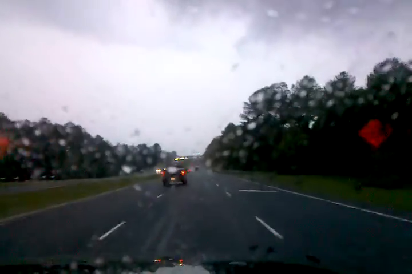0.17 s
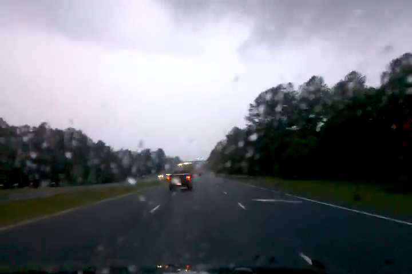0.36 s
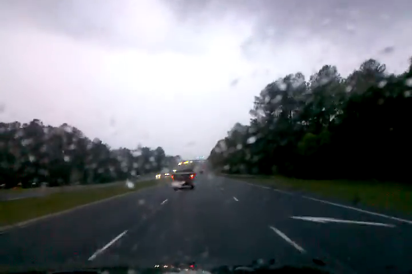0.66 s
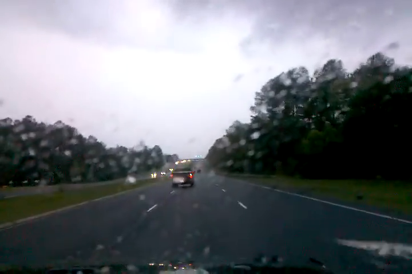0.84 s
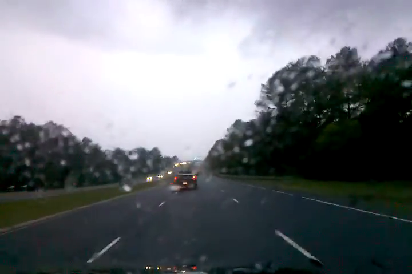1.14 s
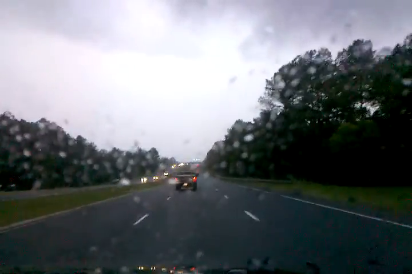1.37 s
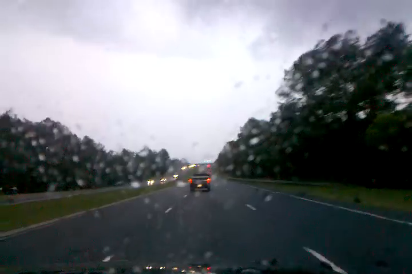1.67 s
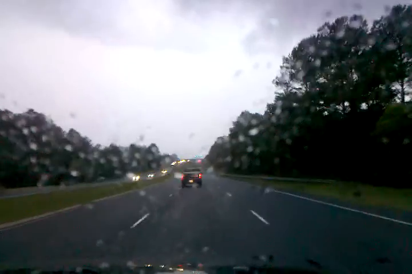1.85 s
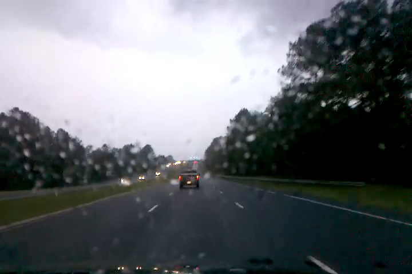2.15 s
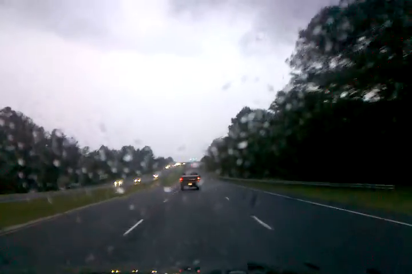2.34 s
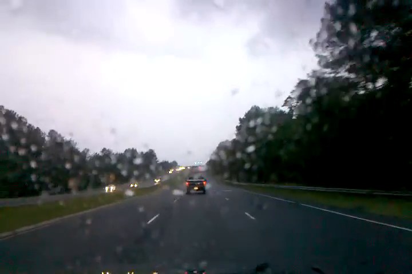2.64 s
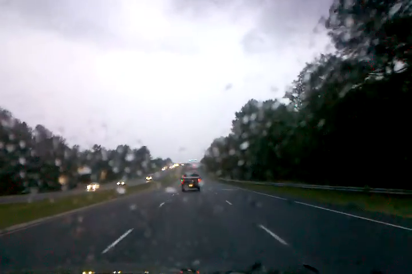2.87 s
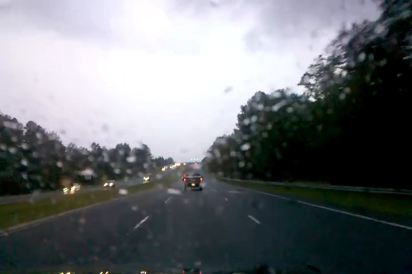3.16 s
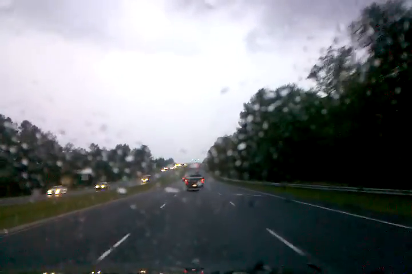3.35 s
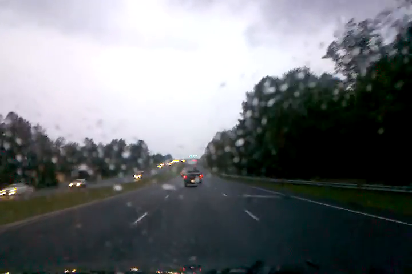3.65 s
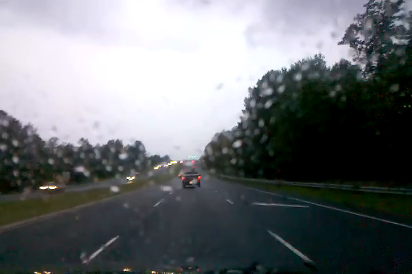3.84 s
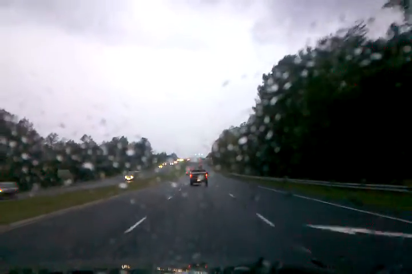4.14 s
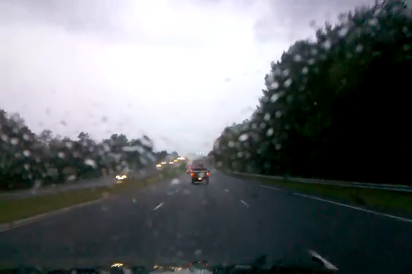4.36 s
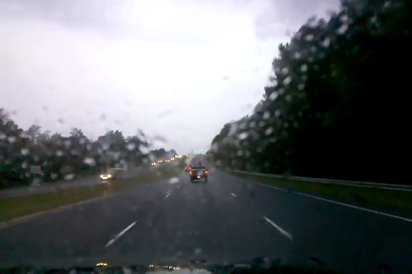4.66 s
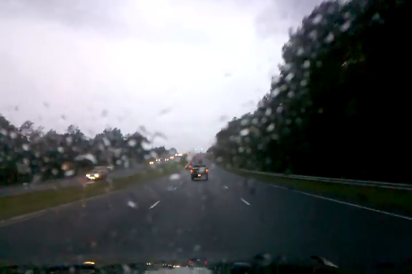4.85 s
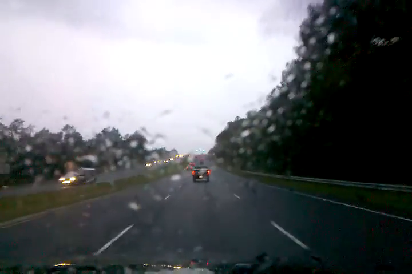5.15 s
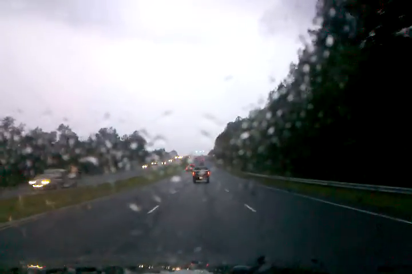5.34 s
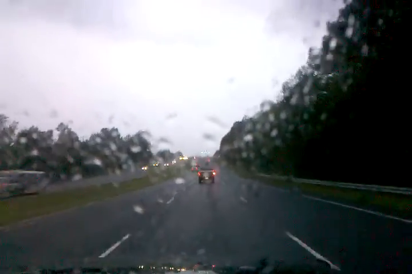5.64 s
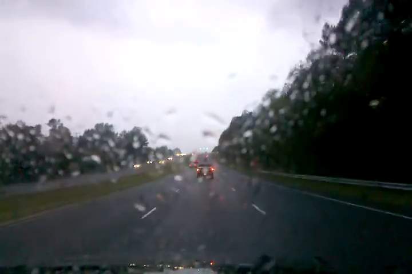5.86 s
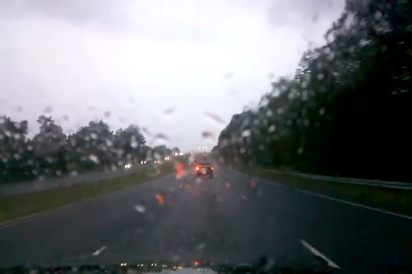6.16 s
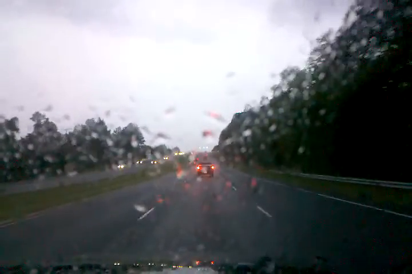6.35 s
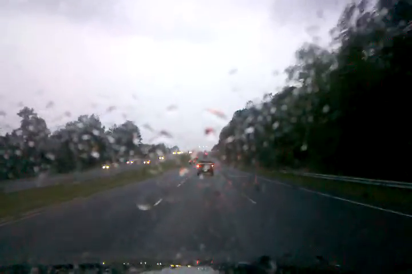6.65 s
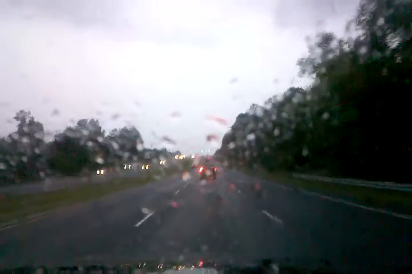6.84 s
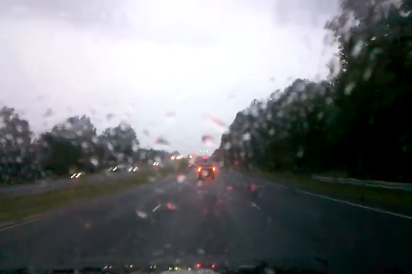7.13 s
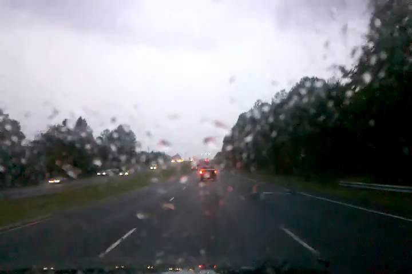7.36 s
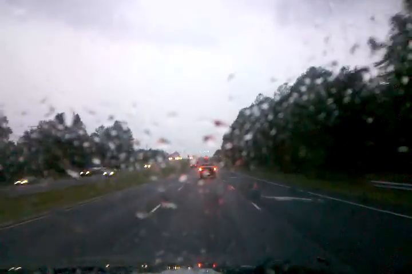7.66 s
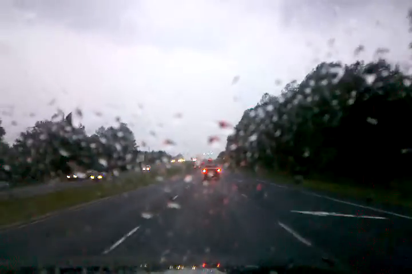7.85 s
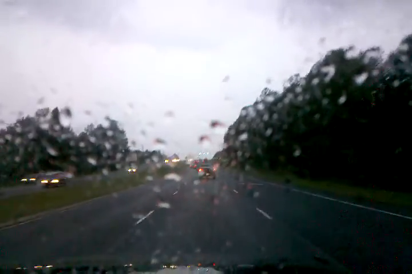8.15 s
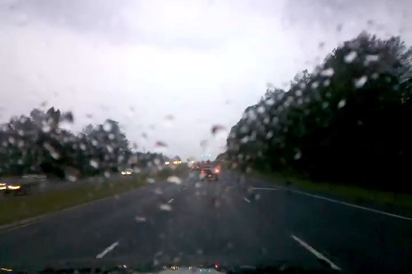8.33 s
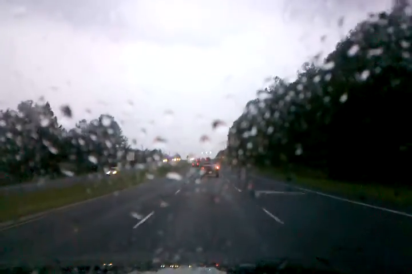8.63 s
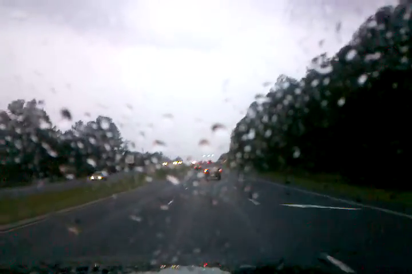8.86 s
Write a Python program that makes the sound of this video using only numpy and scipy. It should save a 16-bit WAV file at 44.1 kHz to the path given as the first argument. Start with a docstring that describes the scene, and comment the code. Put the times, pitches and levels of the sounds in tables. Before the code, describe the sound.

Steady tyre rumble and rushing wind fill a moving car, with the microphone inside. The start is loudest, with short buffets of air and a sharp knock from the trim, and two more knocks follow in the first third. Wet road spray hisses against the body while light, grainy rain patters on the windshield, with larger drops ticking out irregularly. The rumble eases a little as the rain carries on, sounding enclosed and somewhat muffled.

```python
"""Inside a car on a wet highway in the rain.
Tyres rumble through the cabin, gusts rush and buffet over the body, and the trim knocks now and then.
Road spray hisses on the body; rain sizzles on the windshield, with single fat drops ticking out.
Rumble and rush are fluttering noise, spray and rain are swarms of tiny impacts, all coloured by the
cabin's resonances. The sound is dull above 7 kHz, and its loudest peaks clip with a faint crackle."""
import sys
import numpy as np
from scipy import signal
from scipy.fft import rfft, irfft
from scipy.io import wavfile

SR = 44100
rng = np.random.default_rng(int(sys.argv[2]) if len(sys.argv) > 2 else 0)


def pcm_store(signal):
    """Save signal as 16-bit PCM."""
    levels = np.round(np.clip(np.atleast_2d(signal), -1, 1) * 32767)
    wavfile.write(sys.argv[1], SR, levels.astype(np.int16).T)


N = 396459

# Tone curve of each source: frequency_hz, gain_db
TYRE_EQ = [(20, -61), (32, -43.5), (50, -20), (70, -13), (110, -1.5), (150, 0.5), (220, -0.5), (290, -9.5),
           (360, -10), (600, -23.5), (1500, -39), (4000, -74.5)]
AIR_EQ = [(30, -50), (80, -19), (200, -1), (350, 1.5), (500, -2), (720, -6), (850, -9.5), (1000, -12),
          (1450, -20), (2200, -27), (3000, -34), (7000, -44)]
SPRAY_EQ = [(200, -31), (700, -3.5), (1200, 1), (1500, -2), (1900, -1), (2500, -2.5), (3000, -11.5),
            (3600, -16.5), (5000, -24), (8000, -29)]
SIZZLE_EQ = [(300, -34.5), (1200, -2), (2300, -1), (3000, -4.5), (3500, -5.5), (4500, -4), (5800, -2),
             (6900, 0.5), (8000, -6.5)]
BUFFET_EQ = [(40, -34), (130, 0), (420, 4.5), (650, -5.5), (1000, -5.5), (1400, -9.5), (2000, -12),
             (3500, -9.5), (7000, -30)]
DROP_EQ = [(300, -11), (1200, -5.5), (2400, 3.5), (3300, -2.5), (4200, -4.5), (4900, -4), (5700, -3.5),
           (6900, -1), (9000, -25.5)]
# Resonances of cabin air, panels and glass: centre_hz, width_hz, lift_db
CABIN_MODES = [(138, 7.8, 0.5), (215, 39, 1), (325.4, 30, -2), (350, 52, 2), (528, 20, 1), (642, 28, 4),
               (809, 106, 4), (896, 16, 3.5), (1138, 74, 1.5), (1230, 30, 5), (1265, 71, 3.5),
               (1380, 27, 4.5), (1360, 50, 0), (1579, 108, 6.5), (1708, 130, 4), (2120, 54, 4.5),
               (2240, 140, 1.5), (2512, 85, 3), (3934, 190, 4.5), (5240, 340, 6), (6540, 300, 1)]
# Fader rides for road roughness, gust strength and how hard it rains: time_s, relative_db
ROAD_RIDE = [(0.0, -13.5), (0.25, -13.5), (0.48, -17.5), (0.78, -11), (1.4, -15), (1.85, -16.5),
             (2.35, -17), (2.52, -15.5), (2.8, -17.5), (3.1, -15.4), (4.1, -15.0), (4.48, -18),
             (4.92, -13.5), (5.2, -18.9), (5.45, -16.5), (6.6, -19.0), (7.3, -18), (8.98, -18.5)]
GUST_RIDE = [(0.0, -11.5), (0.42, -20.0), (0.9, -15.5), (1.3, -16.0), (1.62, -20.5), (1.85, -21.0),
             (2.05, -17.5), (2.35, -21.5), (2.55, -17), (2.8, -21.0), (3.1, -13.5), (3.28, -22),
             (3.85, -16.5), (4.22, -19.5), (4.85, -17.5), (5.25, -20.9), (7.45, -20.5), (8.98, -22)]
RAIN_RIDE = [(0.0, -34), (0.3, -37), (0.8, -34), (1.3, -34.5), (1.62, -37.5), (2.1, -36.5), (2.38, -37),
             (2.65, -39.5), (3.15, -39), (3.75, -35), (4.35, -34.5), (4.92, -35), (5.08, -38.5),
             (5.75, -36), (6.45, -34.5), (7.15, -35.5), (7.7, -37.5), (8.98, -37.5)]
# Buffets of air on the body: peak_s, level_db, length_s, cutoff_hz
BUFFET_CUES = [(.03, -15.5, 0.034, 1600), (0.167, -12, .017, 328), (.28, -14, .022, 1300),
               (1.018, -17, .015, 300), (1.083, -12, 0.031, 298), (1.316, -17, .012, 2200),
               (1.504, -14.5, .02, 1400), (2.11, -19, .025, 400), (2.91, -19, .025, 300),
               (3.104, -18.5, 0.022, 1000), (3.813, -17.5, 0.027, 230), (4.306, -16, .025, 232),
               (7.275, -20, .03, 230), (7.97, -19, .04, 200)]
# Knocks of the cabin trim: start_s, peak_db
KNOCK_CUES = [(.2037, -4), (1.3155, -6), (3.1678, -6.5)]
# Ringing modes of the trim: pitch_hz, relative_db, t60_s
TRIM_MODES = [(554, 0.5, 0.019), (900, -0.5, .022), (1290, -4.5, 0.017)]
# Fat drops on the windshield: start_s, strength_db, ring_hz
DROP_CUES = [(0.5252, -5.5, 5200), (0.6109, -2.5, 5050), (0.7367, -7.5, 3890), (0.786, -4, 4770),
             (0.853, 1.5, 5300), (1.1474, -8, 5260), (1.491, 3, 5200), (1.784, -5, 3920),
             (1.8435, -6, 5170), (1.867, -1.5, 4900), (2.0022, -3.5, 5020), (2.535, -5, 5500),
             (2.771, -5, 5000), (3.8708, -6, 6760), (4.0644, -8, 5130), (4.6852, -4, 5050),
             (4.849, -2, 6100), (4.9002, -10, 5030), (5.4855, -8, 5250), (5.6533, -5.5, 5170),
             (6.0208, 1, 4930), (6.1433, -4, 5340), (6.2286, -8, 5000), (6.406, -4, 6860),
             (6.4684, -5.5, 5300), (6.9111, -11, 5360), (7.0767, -7.5, 6780), (7.237, -12, 6690),
             (7.3202, -8, 3840), (7.7931, -10, 5140), (8.423, -1.5, 5400)]
# Treble roll-off of the whole mix: frequency_hz, gain_db
MASTER_EQ = [(6800, 0), (7100, -5), (7400, -14), (7700, -23.5), (8100, -32.5), (8700, -27), (9300, -49.5),
             (11000, -63)]


def gain_of(db):
    """Decibels to amplitude."""
    return 10 ** (np.asarray(db) / 20)


def unit_rms(x):
    """Scales to rms 1."""
    return x / np.sqrt(np.mean(x ** 2) + 1e-20)


def place(mix, start_s, sound):
    """Lays a sound into the mix, no earlier than time zero."""
    part = mix[max(round(start_s * SR), 0):][:len(sound)]
    part += sound[:len(part)]


def colour(x, eq, modes=(), size=8192):
    """Minimum-phase EQ: a tone curve on a log-frequency axis, plus a bell at each resonance."""
    hz = abs(np.fft.fftfreq(size, 1 / SR))
    eq_hz, eq_db = np.transpose(eq)
    curve_db = np.interp(np.log(hz + 1), np.log(eq_hz + 1), eq_db)
    bells_db = sum(lift * 2 ** -(2 * (hz - centre) / width) ** 2 for centre, width, lift in modes)
    log_gain = np.log(gain_of(curve_db + bells_db))
    response = np.exp(np.conj(signal.hilbert(log_gain)))
    impulse = np.fft.ifft(response).real[:size // 2]
    return signal.oaconvolve(x, impulse)[:len(x)]


def ride(points, usual_db, depth):
    """Level in dB over time: the ride's swings, scaled by depth, around the usual level."""
    db = np.interp(np.arange(N) / SR, *np.transpose(points))
    return usual_db + depth * (db - db.mean())


def flutter(rate_hz):
    """Random wobble of rms 1, moving at up to about the given rate."""
    hz = np.fft.rfftfreq(N, 1 / SR)
    spectrum = rfft(rng.standard_normal(N)) * np.exp(-(hz / rate_hz) ** 2)
    return unit_rms(irfft(spectrum, N))


def patter(per_s, spread_db):
    """Clicks at random moments; with spread, many small and a few large."""
    strength = gain_of(spread_db * np.minimum(rng.exponential(1, N), 4))
    polarity = rng.choice([-1, 1], N)
    hits = rng.random(N) < per_s / SR
    return strength * polarity * hits


def tyre_rumble(level_db):
    """The rough road shakes the cabin through the tyres."""
    shake = rng.standard_normal(N) * gain_of(1.2 * flutter(rate_hz=15))
    return gain_of(level_db) * unit_rms(colour(shake, TYRE_EQ, CABIN_MODES))


def air_rush(level_db):
    """Turbulent air rushes along the body."""
    eddies = rng.standard_normal(N) * gain_of(0.81 * flutter(rate_hz=45))
    return gain_of(level_db) * unit_rms(colour(eddies, AIR_EQ, CABIN_MODES))


def road_spray(level_db):
    """Water thrown up from the road hisses against the body in dense grains."""
    grains = patter(per_s=5000, spread_db=2)
    return gain_of(level_db) * unit_rms(colour(grains, SPRAY_EQ, CABIN_MODES))


def splash(crack_s, tail_db, tail_s, size=2048):
    """One drop bursts in a short crack with a faint tail of droplets."""
    t = np.arange(size) / SR
    envelope = np.exp(-t / crack_s) + gain_of(tail_db) * np.exp(-t / tail_s)
    burst = rng.standard_normal(size) * envelope
    return burst / np.linalg.norm(burst)


def rain_sizzle(level_db):
    """Countless fine drops merge into a sizzle, with a patter of larger ones on top."""
    fine_drops = patter(per_s=7000, spread_db=0)
    sizzle = unit_rms(colour(fine_drops, SIZZLE_EQ, CABIN_MODES))
    larger_drops = np.zeros(N)
    for _ in range(8):  # eight splash variations, each on its own random rhythm
        hits = patter(per_s=14, spread_db=2)
        larger_drops += signal.oaconvolve(hits, splash(crack_s=0.0017, tail_db=-12, tail_s=0.006))[:N]
    ticks = unit_rms(colour(larger_drops, DROP_EQ, CABIN_MODES))
    return gain_of(level_db) * (gain_of(1.5) * sizzle + gain_of(-2.5) * ticks)


def air_buffets():
    """Short swells of pressure thump the panels, some dull, some bright."""
    out = np.zeros(N)
    for peak_s, level_db, length_s, cutoff_hz in BUFFET_CUES:
        push = colour(rng.standard_normal(SR // 4), BUFFET_EQ)
        push = signal.sosfilt(signal.butter(4, cutoff_hz, fs=SR, output="sos"), push)
        swell = np.hanning(2 * round(length_s * SR))  # length_s up, length_s down
        thump = unit_rms(push[-len(swell):] * swell)
        place(out, peak_s - length_s, gain_of(level_db) * thump)
    return out


def trim_knocks(attack_s=0.00092):
    """A jolt knocks the trim, which rings briefly in a few damped modes."""
    out = np.zeros(N)
    t = np.arange(SR // 10) / SR
    ring = sum(gain_of(db - 60 * t / t60) * np.sin(2 * np.pi * hz * t) for hz, db, t60 in TRIM_MODES)
    ring *= 1 - np.exp(-t / attack_s)
    for start_s, peak_db in KNOCK_CUES:
        place(out, start_s, gain_of(peak_db) * ring / abs(ring).max())
    return out


def fat_drops():
    """Each fat drop strikes the glass, splashes, and rings for a moment at its own pitch."""
    out = np.zeros(N)
    for start_s, strength_db, ring_hz in DROP_CUES:
        strike = gain_of(3.5) * splash(crack_s=0.003, tail_db=-10, tail_s=0.0069)
        strike[0] += 1  # the click of the impact itself
        ring = (ring_hz, 830, 10.5)  # centre_hz, width_hz, lift_db
        body = (2500, 2500, 1.5 + 0.5 * strength_db)  # heavier drops sound fuller
        tick = colour(strike, DROP_EQ, [ring, body])
        place(out, start_s, gain_of(strength_db) * tick / np.linalg.norm(tick))
    return out


def scene():
    """The mono cabin mix: beds of road, air and water, with thumps, knocks and drops on top."""
    flurry_db = 0.55 * flutter(rate_hz=24)  # the water arrives in uneven flurries
    tyres = tyre_rumble(ride(ROAD_RIDE, usual_db=-19, depth=1.01))
    air = air_rush(ride(GUST_RIDE, usual_db=-22, depth=0.99))
    bumps = air_buffets() + trim_knocks()
    spray = road_spray(ride(RAIN_RIDE, usual_db=-30, depth=0.55) + 0.5 * flurry_db)
    rain = rain_sizzle(ride(RAIN_RIDE, usual_db=-39, depth=1) + flurry_db)
    return (tyres + air + bumps + spray + rain + fat_drops())[None]


def record(dry):
    """Dulls the mix above 7 kHz; the loudest peaks clip with a faint crackle, which is low-passed."""
    ceiling, knee_hardness = 0.71, 24
    drive = colour(dry[0], MASTER_EQ) / ceiling
    clipped = ceiling * drive / (1 + drive ** knee_hardness) ** (1 / knee_hardness)
    low_pass = signal.firwin(511, cutoff=15800, window=("kaiser", 9), fs=SR)
    return signal.oaconvolve(clipped, low_pass, "same")[None]


dry = scene()
out = record(dry)
pcm_store(out)
```